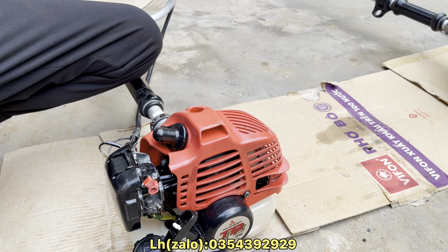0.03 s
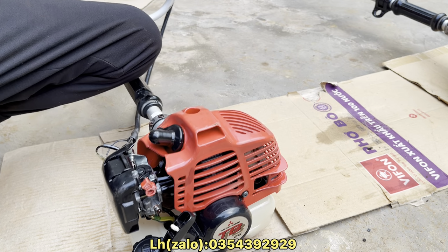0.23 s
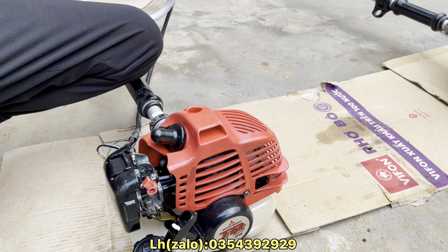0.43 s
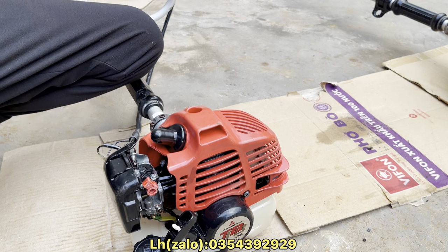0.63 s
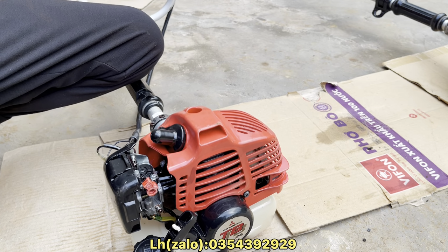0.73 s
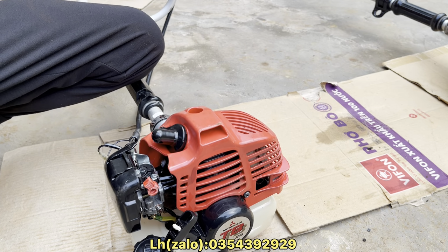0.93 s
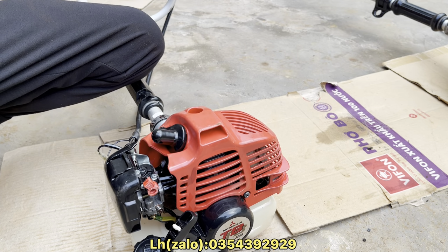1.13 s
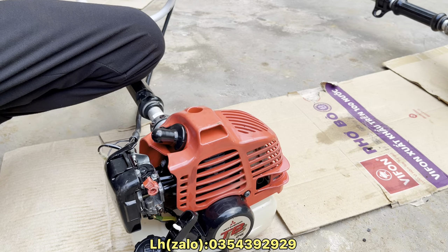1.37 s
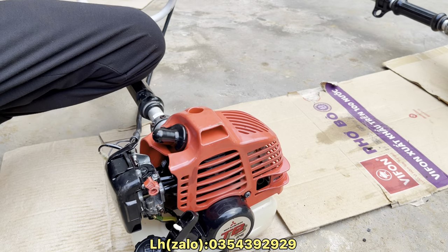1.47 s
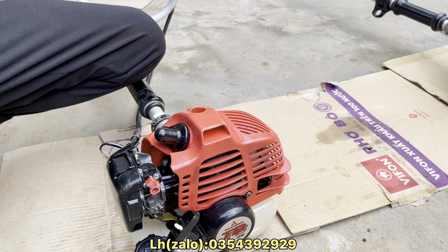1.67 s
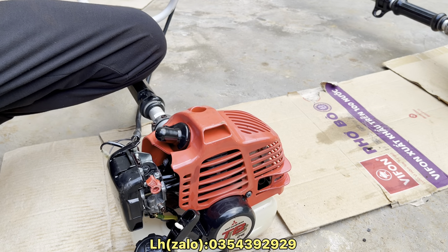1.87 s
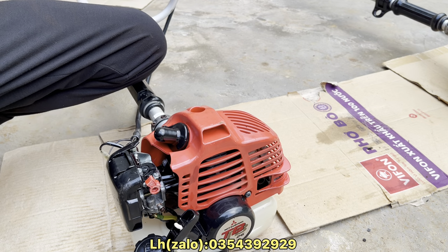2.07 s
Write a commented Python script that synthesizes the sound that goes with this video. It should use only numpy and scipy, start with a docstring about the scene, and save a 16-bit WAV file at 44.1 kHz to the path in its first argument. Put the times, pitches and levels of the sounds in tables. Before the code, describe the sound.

A small two-stroke brush cutter engine idles very close, about sixty turns a second, popping unevenly with misses, raspy exhaust, piston clatter and loose rattling covers. Around 1.3 seconds it is switched off with a slight click; hollow cold-air chuffs slow and drop, metal clanks and ticks near 1.4-1.7, and it stops. A faint low hum remains to about 2 seconds, with short reflections from nearby walls.

```python
"""A small two-stroke brush cutter idles on the ground, close by, firing hard on about every other turn and
sometimes missing. The kill switch clicks; the piston pumps cold air ever more slowly, the works clank and
tick, and the engine stands still. A low machine hum goes on in the yard.
One crank angle times the gliding exhaust resonances, intake thuds, gated gas noise and piston slaps;
metal contacts are noise bursts and damped modes, and the hum is two sines over filtered noise."""
import sys
import numpy as np
from scipy import signal
from scipy.fft import rfft, irfft, next_fast_len
from scipy.io import wavfile

SR = 44100
rng = np.random.default_rng(int(sys.argv[2]) if len(sys.argv) > 2 else 0)


def unload_audio(sound):
    """Save the sound as a 16-bit wav file, at the path given as the first command line argument."""
    columns = np.transpose(np.atleast_2d(sound))
    # keep every value between -1 and 1, then stretch to whole-number steps
    steps = np.round(np.clip(columns, -1, 1) * 32767)
    wavfile.write(sys.argv[1], SR, steps.astype(np.int16))


N = 92610

# All levels below are relative: later filters and gains act on them too.
# Yard: hum partials, and spectrum of the faint air (frequency [Hz], level [dB])
HUM_PARTIALS = [(69.6, -45), (139.4, -64)]
YARD_SPECTRUM = [(25, -8), (45, -4), (70, 4), (100, -1), (150, -6), (250, -18), (400, -25), (700, -31),
                 (1200, -33), (3000, -36), (9000, -38), (12000, -54)]
YARD_DB = -56
# Reverberation time of the nearby walls (frequency [Hz], t60 [s])
ECHO_T60 = [(100, .4), (300, .3), (700, .45), (1500, .5), (5000, .5), (12000, .42)]
ECHO_DB, ECHO_BASS_DB = -13.5, -16
# Correlation of left and right in diffuse sound (frequency [Hz], correlation [-1 to 1])
STEREO_LIKENESS = [(100, 1), (300, .95), (600, .8), (1100, .62), (2200, -.35), (4500, -.15), (6500, .3),
                   (9000, -.7), (11500, .92)]
# Left minus right level (frequency [Hz], difference [dB])
LEFT_LEAN = [(60, .6), (125, 1.2), (240, 2.4), (360, 1.6), (650, 1.8), (1180, 6.6), (2150, 2), (3900, 4.2),
             (7000, 2), (11000, 0)]
# Microphone response (frequency [Hz], gain [dB])
MIC_RESPONSE = [(25, -4), (65, 0), (120, 0), (240, 0), (530, 0), (1200, 0), (3000, 0), (12000, 0)]
NOTCH_HZ, NOTCH_WIDTH_HZ, NOTCH_DB = 10130, 340, -30
TOP_HZ = 13450  # band limit
GROUND_DB, GROUND_S, LEFT_LEAD_S = -16, .0015, .00006  # ground bounce, and lead of the left port

# Idle speed of the crank (time [s], speed [turns/s])
IDLE_SPEED = [(0.0, 60.99), (0.1, 60.95), (0.18, 62.56), (0.35, 62.2), (0.45, 61.09), (0.6, 60.29),
              (0.83, 58.38), (0.95, 60.11), (1.05, 60.29), (1.3, 58.46)]
CUT_S = 1.2988  # the exhaust port opens for the last live turn
BRAKE_PER_S2, LAST_TURN_HZ = 174, 60.2  # friction slows the crank evenly from this speed [turns/s]
# Turns that fail to fire (time [s])
MISS_TIMES = [.008, .09, .187, .219, .283, .363, .412, .494, .643, .76, .829, .913, 1.08, 1.163, 1.214]
BURN_MEMORY, BURN_SCATTER = .55, .08  # a strong burn fouls the next charge
# Compression delays the slow turns (speed [turns/s], delay [s])
COMPRESSION_DELAY = [(12, .0003), (22, .003), (28, .0002), (55, 0)]

# Metal knocks, clanks and ticks (time [s], level [dB], treble relative to body [dB], decay [s])
KNOCK_EVENTS = [(.0388, -27, -15, .003), (.0852, -36, -5, .002), (.183, -35, -6, .002),
                (.2658, -25, -20, .0025), (.394, -28, -15, .002), (.542, -32, -15, .002),
                (.6252, -24, -17, .0025), (.8435, -33, -7, .002), (1.305, -38, 6, .005),
                (1.411, -34, -9, .004), (1.4355, -33, -8, .004), (1.4605, -37, -10, .005),
                (1.5, -46, 0, .008), (1.5215, -42, 3, .003), (1.55, -43, 3, .008), (1.5588, -36, 7, .0035),
                (1.5645, -36, 0, .004), (1.578, -49, 3, .004), (1.624, -49, -9, .007),
                (1.667, -49, -1, .006), (1.6872, -47, -8, .003), (1.7105, -54, -8, .004),
                (1.795, -66, -4, .003), (2.0372, -72, 13, .002)]
# Spectra of the knock's body and of its bright edge (frequency [Hz], level [dB])
KNOCK_BODY_SPECTRUM = [(200, -18), (600, -2), (1300, -2), (1700, -2), (2100, 3), (3000, -11), (6000, -23),
                       (13000, -40)]
KNOCK_EDGE_SPECTRUM = [(1000, -25), (2500, -4), (4500, -1), (7000, -7), (8200, 2), (11000, -4),
                       (13000, -13)]
# Modes of the stalling clank, then of the settling one (frequency [Hz], decay [s], level [dB])
STALL_MODES = [(1995, .005, -31), (2450, .004, -39), (4450, .005, -37), (5090, .005, -37),
               (7900, .003, -35), (9200, .004, -37)]
SETTLE_MODES = [(1230, .006, -45), (2350, .004, -48), (3630, .003, -53), (5150, .003, -56)]
STALL_S, SETTLE_S, CLANK_LAG_S, MODE_RISE_S = 1.559, 1.6872, .00006, .0004
# Spectrum of the loose covers (frequency [Hz], level [dB])
RATTLE_SPECTRUM = [(700, -25), (1500, -3), (2300, 0), (3500, -4), (6000, -9), (12000, -18)]
RATTLE_COUNT, RATTLE_DB, RATTLE_SPREAD_DB, RATTLE_DECAY_S = 170, -53, 5, .0012
# Spectrum of the piston, bearings and fan (frequency [Hz], level [dB])
CLATTER_SPECTRUM = [(900, -8), (1500, -3), (1900, -2), (3200, -9), (6000, -8.5), (7100, -13.5),
                    (9200, -4.5), (11300, -8), (12400, -12.5), (13200, -36)]
# Added level of the clatter (time [s], level [dB])
CLATTER_LEVEL = [(0, -1), (.7, -.5), (.9, 2), (1.3, 2.5), (1.45, 1.5)]
CLATTER_DB, CLATTER_SWING, CLATTER_GROWS = -43.2, .38, .8  # the last is the exponent on speed
# Spectrum of the struck casing (frequency [Hz], level [dB])
CASING_SPECTRUM = [(200, -25), (500, -4), (780, 0), (900, -7), (1150, 0), (1220, -5), (1290, 1), (1400, -5),
                   (1700, -7), (2600, -9), (5000, -20), (13000, -28)]
SLAP_DB, SLAP_DELAY_S = -13, .0077  # delay at LAST_TURN_HZ; longer on slower turns
SHAKE_DB, SHAKE_DELAY_S = -41, .0095  # delay at LAST_TURN_HZ; a constant share of a turn

# Spectrum of the rasping gas (frequency [Hz], level [dB])
RASP_SPECTRUM = [(150, -20), (400, -1), (700, 0), (900, -7), (1200, -1), (1700, -8), (2600, -13),
                 (5000, -24), (12000, -40)]
RASP_DB, RASP_DECAY_S, RASP_COLD_DB = -41.6, .007, -.5
# Spectrum of the cold air (frequency [Hz], level [dB])
CHUFF_SPECTRUM = [(250, -15), (600, 2), (1000, -2), (2000, -4), (4000, -9), (7000, -15), (12000, -25)]
# Strength of the chuff (speed [turns/s], amplitude [share])
CHUFF_STRENGTH = [(12, .5), (23, .8), (40, 1), (58, .3)]
CHUFF_DB, CHUFF_PEAK_S = -39, .004
# Tailpipe modes, rung at every turn (frequency [Hz], decay [s], level [dB])
PIPE_MODES = [(540, .006, -29.5), (675, .008, -36), (790, .009, -39.5), (1060, .008, -43.5),
              (1160, .008, -42)]
# The piston rocks back (time [s], frequency [Hz], decay [s], level [dB])
PISTON_REBOUNDS = [(1.644, 215, .007, -37), (1.665, 410, .004, -46), (1.683, 215, .009, -47)]
INTAKE_HZ, INTAKE_DELAY_S, INTAKE_WIDTH_S, INTAKE_DB = 188, .0092, .0028, -20
INTAKE_BASE, INTAKE_SCATTER_DB = .2, .7  # the draw follows the burn, unevenly
# Exhaust resonances: cold gulp, firing pop, closing port; pitch and timing stretch by turn for gulp and pop
# (start [Hz], end [Hz], glide [s], rise [s], decay [s], level [dB])
GULP_RING = (575, 143, .0033, .003, .0085, -9)
POP_RING = (650, 255, .003, .001, .0037, -17.3)
SHUT_RING = (250, 300, .004, .0015, .0045, -20)
HEAT_SCATTER, JITTER_S = .035, .0001  # pitch [share] and timing vary by turn
POP_DELAY_S, POP_GROWS = .0003, 1.1  # the last is the exponent on burn
GULP_LEFT, MISS_GULP = .12, .7  # least gulp; factor on all gulps before the cut
SLOW_PITCH, SLOW_LEVEL, FADE_HZ = .22, 1.15, 25  # exponents on speed; the gulp weakens under FADE_HZ
PORT_OPEN_TURNS, SHUT_SLOWEST_HZ = .5, 23  # open share of a turn, and the least speed used for it
SHUT_DELAY_S, SHUT_SLOWS = .008, .6  # delay at LAST_TURN_HZ, and its exponent on slowness
# Response of the silencer (frequency [Hz], gain [dB])
SILENCER_RESPONSE = [(30, -8), (62, -4), (100, 7), (125, 2.5), (175, -4), (240, 2), (310, -1.5), (400, 1),
                     (540, 3), (800, 1)]


def amp(db):
    """Decibel law: level to amplitude gain."""
    return 10 ** (np.asarray(db) / 20)


def unit(x):
    """Power normalization: scale to rms 1."""
    return x / np.sqrt(np.mean(x ** 2) + 1e-20)


def along(points, hz):
    """Logarithmic pitch scale: interpolate (frequency, value) points on it."""
    f, v = np.transpose(points)
    return np.interp(np.log(hz + 1), np.log(f + 1), v)


def filtered(x, response):
    """Linear filtering: multiply the spectrum by a response of frequency."""
    m = next_fast_len(N + SR // 2)
    return irfft(rfft(x, m) * response(np.fft.rfftfreq(m, 1 / SR)), m)[..., :N]


def spread(pair, spectrum):
    """Interaural correlation: mid and side shares of two unrelated signals set the likeness of the ears."""
    def shares(hz):
        angle = np.arccos(np.clip(along(STEREO_LIKENESS, hz), -1, 1)) / 2
        return amp(along(spectrum, hz)) * [np.cos(angle), np.sin(angle)]

    mid, side = filtered(pair, shares)
    return np.array([mid + side, mid - side])


def noise(spectrum):
    """Broadband turbulence or friction: coloured stereo noise of rms 1."""
    return unit(spread(rng.standard_normal((2, N)), spectrum))


def play(times, shape):
    """Superposition: sum short sounds; shape(k, age) is the k-th one."""
    out = np.zeros(N)
    for k, start in enumerate(times):
        first = max(int(np.ceil(start * SR)), 0)
        i = np.arange(first, min(int(start * SR) + SR // 10, N))
        out[i] += shape(k, i / SR - start)
    return out


def modes(age, table):
    """Modal superposition: fixed resonances ring down together."""
    def mode(hz, decay, db):
        envelope = (1 - np.exp(-age / MODE_RISE_S)) * np.exp(-age / decay)
        return amp(db) * envelope * np.sin(2 * np.pi * hz * age)

    return sum(mode(*row) for row in table)


def ring(age, start_hz, end_hz, glide, rise, decay, db):
    """Time-varying resonance: it swells and dies while its pitch glides."""
    cycles = end_hz * age + (start_hz - end_hz) * glide * (1 - np.exp(-age / glide))
    envelope = (1 - np.exp(-(age / rise) ** 2)) * np.exp(-age / decay)
    return amp(db) * envelope * np.sin(2 * np.pi * cycles)


def yard():
    """Tonal radiation: a steady machine hum of sine partials over faint air noise."""
    t = np.arange(N) / SR
    hum = sum(np.sqrt(2) * amp(db) * np.sin(2 * np.pi * (hz * t + rng.random())) for hz, db in HUM_PARTIALS)
    return hum + amp(YARD_DB) * noise(YARD_SPECTRUM)


def echo(x):
    """Reverberant decay: nearby walls answer, and each frequency dies at its own rate."""
    hz, t, z = signal.stft(rng.standard_normal((2, SR // 2)), SR, nperseg=256)
    fade = amp(-60 * t / along(ECHO_T60, hz)[:, None])
    tail = signal.istft(z * fade, SR, nperseg=256)[1]
    return signal.fftconvolve(np.atleast_2d(x), tail / np.linalg.norm(tail[0]), axes=1)[:, :N]


def crank():
    """Rotational kinematics: integrated speed gives the angle, whose whole turns time the burns."""
    t = np.arange(N) / SR
    braked = np.maximum(LAST_TURN_HZ - BRAKE_PER_S2 * (t - CUT_S), 0)
    speed = np.where(t < CUT_S, np.interp(t, *np.transpose(IDLE_SPEED)), braked)
    angle = np.cumsum(speed) / SR
    angle -= np.interp(CUT_S, t, angle)
    turns = np.arange(np.floor(angle[0]), angle[-1] - .25)
    # one turn before the start is included
    times = np.interp(turns, np.r_[angle[0] - 1, angle], np.r_[-1 / speed[0], t])
    chance, burn = rng.standard_normal(200), [.7]
    for s, c in zip(times, chance):
        dead = s > CUT_S + .008 or np.abs(np.array(MISS_TIMES) - s).min() < .008
        charge = 1.1 - BURN_MEMORY * burn[-1] + BURN_SCATTER * c
        burn.append(0 if dead else np.clip(charge, .1, 1))
    rates = np.interp(times, t, speed)
    times = times + np.interp(rates, *np.transpose(COMPRESSION_DELAY))
    return speed, angle, times, rates, np.array(burn[1:])


def knocks():
    """Damped impact: short dead metal contacts with a body and a bright edge."""
    s, db, treble_db, decay = np.transpose(KNOCK_EVENTS)

    def blows(level):
        return play(s, lambda k, a: amp(level[k]) * (1 - np.exp(-a / .0005)) * np.exp(-a / decay[k]))

    body = blows(db) * noise(KNOCK_BODY_SPECTRUM)
    edge = blows(db + treble_db) * noise(KNOCK_EDGE_SPECTRUM)
    return amp(3) * (body + edge)


def clanks():
    """Modal ringing: metal sounds as the crank stalls and once more as it settles, the right ear lagging."""
    def strike(start, table):
        return play([start], lambda k, a: modes(a, table))

    return np.array([strike(STALL_S + lag, STALL_MODES) + strike(SETTLE_S + lag, SETTLE_MODES)
                     for lag in (0, CLANK_LAG_S)])


def rattle(speed):
    """Random impacts: loose covers tick by chance while the engine shakes them."""
    chance = rng.random((RATTLE_COUNT, 2))
    size = amp(RATTLE_SPREAD_DB * np.minimum(-np.log(1 - chance[:, 1]), 2))
    ticks = play(chance[:, 0] * N / SR, lambda k, a: size[k] * np.exp(-a / RATTLE_DECAY_S))
    return amp(RATTLE_DB) * unit(ticks) * speed / LAST_TURN_HZ * noise(RATTLE_SPECTRUM)


def clatter(speed, angle):
    """Periodic modulation: noise of piston, bearings and fan swells at once and twice the crank rate."""
    swing = np.exp(CLATTER_SWING * (.5 * np.cos(4 * np.pi * angle) - .6 * np.sin(2 * np.pi * angle)))
    level = amp(CLATTER_DB + np.interp(np.arange(N) / SR, *np.transpose(CLATTER_LEVEL)))
    hiss = noise([(500, -25)] + list(CLATTER_SPECTRUM))
    return level * (speed / LAST_TURN_HZ) ** CLATTER_GROWS * swing * hiss


def slap(times, rates):
    """Impulse response: the reversing piston strikes the casing once a turn, harder at speed."""
    burst = rng.standard_normal((2, N)) * np.exp(-np.arange(N) / SR / .005)
    casing = spread(burst, CASING_SPECTRUM)[:, :SR // 20]
    at = times + SLAP_DELAY_S * LAST_TURN_HZ / rates + .00008 * rng.standard_normal(len(times))
    hits = np.zeros(N + SR)
    force = (rates / LAST_TURN_HZ) ** 2 * amp(1.2 * rng.standard_normal(len(times)))
    hits[np.clip(at * SR, 0, N).astype(int)] = force
    struck = signal.fftconvolve(hits[None, :N], casing / np.linalg.norm(casing), axes=1)[:, :N]
    return amp(SLAP_DB) * struck


def shake(speed, angle):
    """Inertial reaction: the whole engine rocks with the piston, as the square of speed."""
    phase = 2 * np.pi * (angle - SHAKE_DELAY_S * LAST_TURN_HZ)
    return amp(SHAKE_DB) * (speed / LAST_TURN_HZ) ** 2 * np.cos(phase)


def rasp(speed, times, rates, burn):
    """Turbulent jet: gas rasps in a decaying burst at each turn, over a constant share that follows speed."""
    cold = amp(RASP_COLD_DB)
    force = (cold + (1 - cold) * burn) * rates / LAST_TURN_HZ
    gate = play(times, lambda k, a: force[k] * np.exp(-a / RASP_DECAY_S))
    return amp(RASP_DB) * unit(gate + .35 * speed / LAST_TURN_HZ) * noise(RASP_SPECTRUM)


def chuff(times, rates):
    """Pulsed flow noise: once the fire is out, cold air chuffs through the port at each turn."""
    force = (times > CUT_S + POP_DELAY_S) * np.interp(rates, *np.transpose(CHUFF_STRENGTH))
    gate = play(times, lambda k, a: force[k] * (a / CHUFF_PEAK_S) ** 2 * np.exp(2 - 2 * a / CHUFF_PEAK_S))
    return amp(CHUFF_DB) * gate * noise(CHUFF_SPECTRUM)


def tailpipe(times, rates):
    """Pipe resonance: each turn excites the modes of the tailpipe, as the square of speed."""
    return play(times, lambda k, a: (rates[k] / LAST_TURN_HZ) ** 2 * modes(a, PIPE_MODES))


def rebounds():
    """Gas spring: the piston rocks back in short swelling, dying tones."""
    s, hz, decay, db = np.transpose(PISTON_REBOUNDS)

    def rock(k, a):
        envelope = 2 * np.e * a / decay[k] * np.exp(-2 * a / decay[k])  # peaks at half the decay
        return -amp(db[k]) * envelope * np.sin(2 * np.pi * hz[k] * a)

    return play(s, rock)


def intake(times, burn):
    """Suction pulse: after each firing turn the intake thuds in a Gaussian wave packet."""
    scatter, jitter = rng.standard_normal((2, len(times)))
    draw = np.minimum(burn + INTAKE_BASE, 1) * (burn > 0) * amp(INTAKE_SCATTER_DB * scatter)

    def thud(a):
        return np.exp(-(a / INTAKE_WIDTH_S) ** 2 / 2) * np.cos(2 * np.pi * INTAKE_HZ * a)

    return amp(INTAKE_DB) * play(times + JITTER_S * jitter, lambda k, a: draw[k] * thud(a - INTAKE_DELAY_S))


def exhaust(times, rates, burn):
    """Cavity resonance: the cylinder pops or gulps cold air, gliding in pitch, and the closing port rings."""
    gulp_chance, pop_chance, jitter = rng.standard_normal((3, len(times)))
    slow = (rates / LAST_TURN_HZ) ** SLOW_PITCH * (1 + HEAT_SCATTER * gulp_chance)
    heat = 1 + HEAT_SCATTER * pop_chance
    cold = np.maximum(1 - burn, GULP_LEFT) * np.where(times < CUT_S, MISS_GULP, 1)
    cold = cold * np.minimum(rates / FADE_HZ, 1) ** SLOW_LEVEL
    open_s = PORT_OPEN_TURNS / np.maximum(rates, SHUT_SLOWEST_HZ)

    def gulp(k, a):
        return -cold[k] * ring(a * slow[k], *GULP_RING) * np.exp(-(a / open_s[k]) ** 4)

    def pop(k, a):
        return burn[k] ** POP_GROWS * ring(a * heat[k], *POP_RING)

    shut_times = times + SHUT_DELAY_S * (LAST_TURN_HZ / rates) ** SHUT_SLOWS
    shut = play(shut_times, lambda k, a: -cold[k] ** 3 * ring(a, *SHUT_RING))
    return play(times, gulp) + shut + play(times + POP_DELAY_S + JITTER_S * jitter, pop)


def gas(times, rates, burn):
    """Acoustic filtering: the silencer colours exhaust, tailpipe, intake and rebounds."""
    pulses = exhaust(times, rates, burn) + tailpipe(times, rates) + intake(times, burn) + rebounds()
    return filtered(pulses, lambda hz: amp(along(SILENCER_RESPONSE, hz)))


def scene():
    """Image source: the engine, its bounce off the ground, its echo and the yard add up."""
    speed, angle, times, rates, burn = crank()
    low = gas(times, rates, burn) + shake(speed, angle)
    high = rasp(speed, times, rates, burn) + clatter(speed, angle) + slap(times, rates)
    high = high + chuff(times, rates) + rattle(speed) + knocks() + clanks()
    side = np.array([[1], [-1]])

    def ports(hz):
        """Interference: direct path plus a bounce that reaches the two ports in opposite sign."""
        direct = np.exp(1j * np.pi * hz * LEFT_LEAD_S * side)
        bounce = amp(GROUND_DB) * np.minimum(hz / 400, 1) * np.exp(-2j * np.pi * hz * GROUND_S)
        return direct + side * bounce

    reverberant = echo(amp(ECHO_DB) * high + amp(ECHO_BASS_DB) * low)
    return filtered(low, ports) + high + reverberant + yard()


def record(dry):
    """Transducer response: microphone colour, a narrow treble notch, a lean to the left and a band limit."""
    def response(hz):
        notch = NOTCH_DB * np.exp(-((hz - NOTCH_HZ) / NOTCH_WIDTH_HZ) ** 2)
        lean = np.outer([.5, -.5], along(LEFT_LEAN, hz))
        return amp(along(MIC_RESPONSE, hz) + notch + lean) * (hz < TOP_HZ)

    return filtered(dry, response)


dry = scene()
out = record(dry)
unload_audio(out)
```